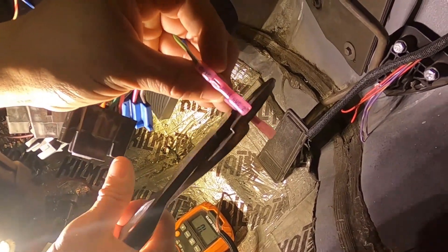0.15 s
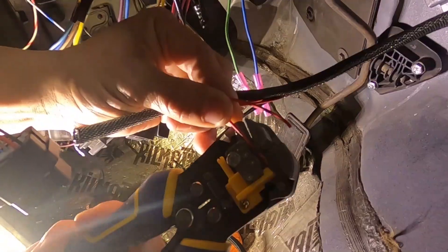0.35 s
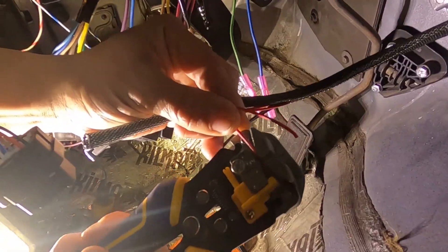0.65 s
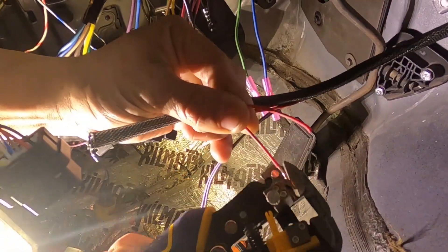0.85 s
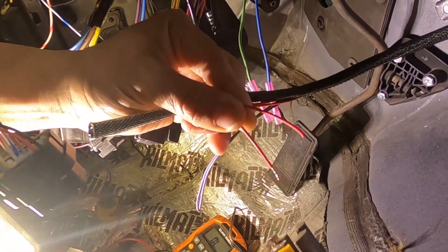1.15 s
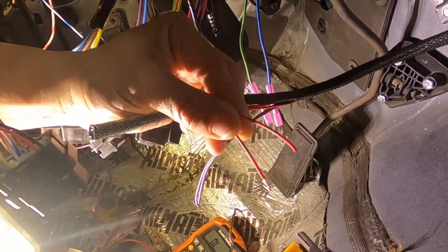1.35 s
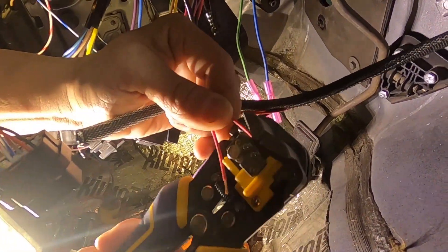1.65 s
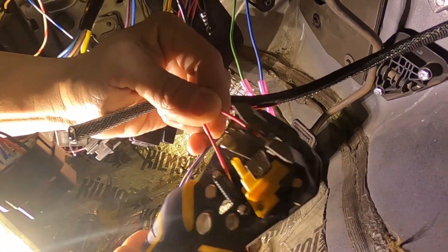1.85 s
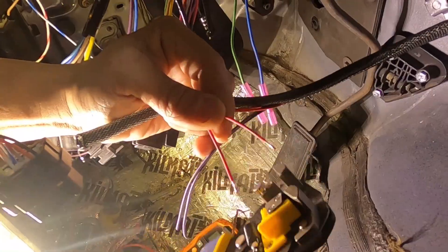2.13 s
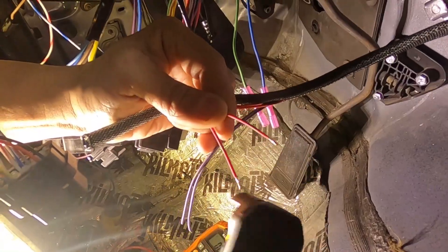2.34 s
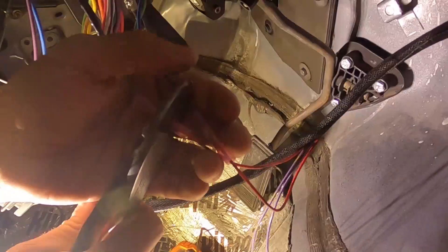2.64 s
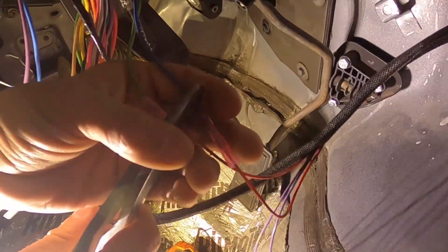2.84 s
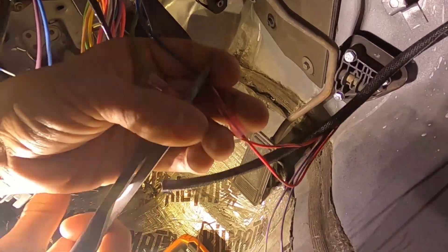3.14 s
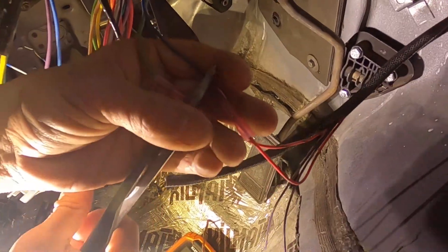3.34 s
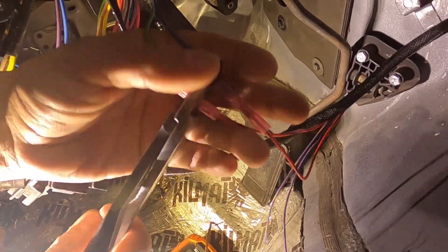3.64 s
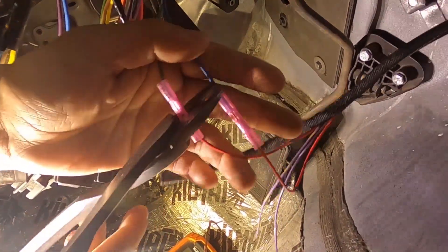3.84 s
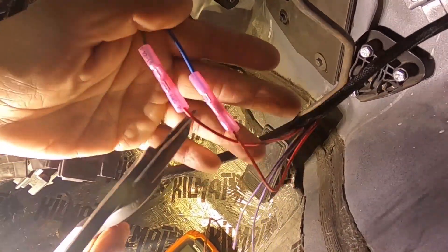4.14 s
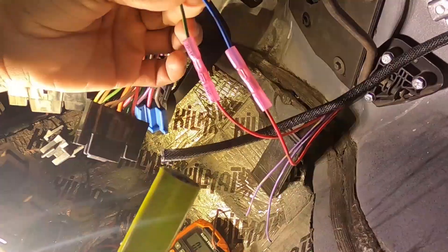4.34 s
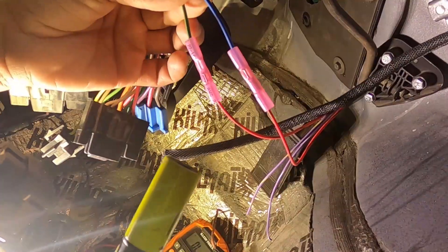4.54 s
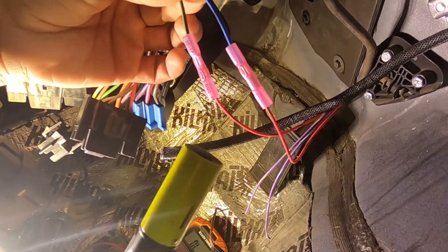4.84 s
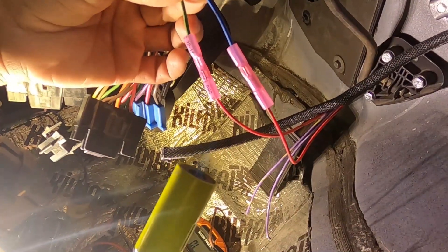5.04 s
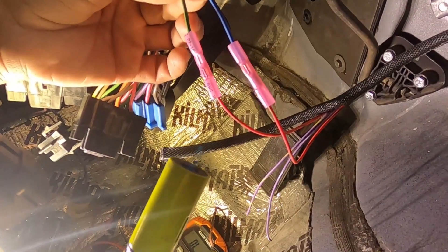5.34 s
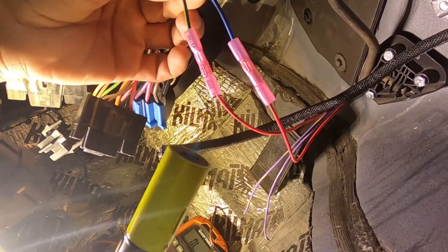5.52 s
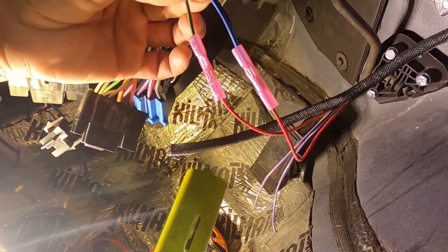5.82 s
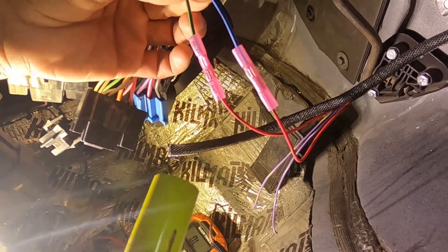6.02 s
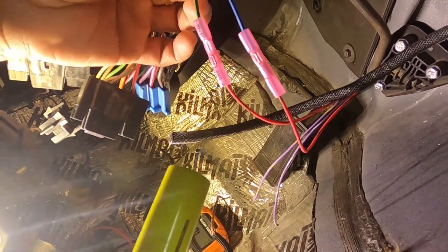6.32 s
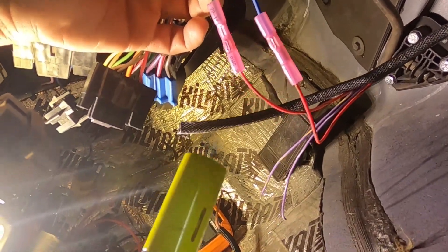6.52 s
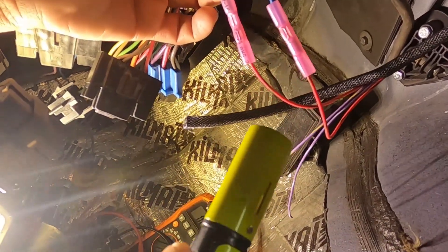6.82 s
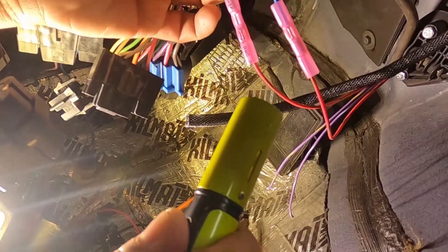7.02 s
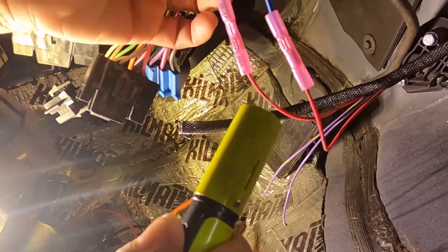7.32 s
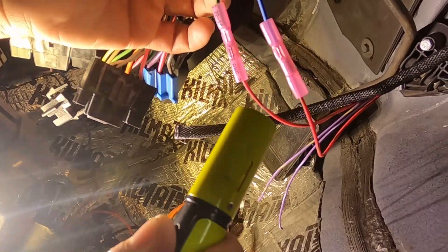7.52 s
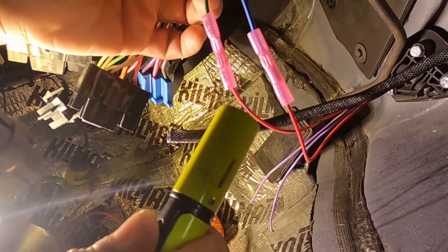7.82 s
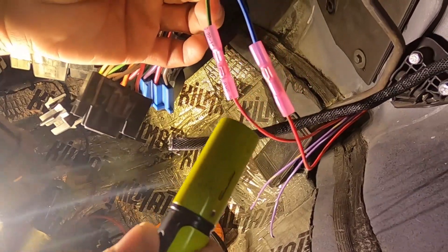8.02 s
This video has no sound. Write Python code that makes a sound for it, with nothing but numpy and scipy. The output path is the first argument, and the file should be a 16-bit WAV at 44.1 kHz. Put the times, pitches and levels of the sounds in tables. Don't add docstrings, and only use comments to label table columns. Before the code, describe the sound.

Nearly mono close microphone: fingers faintly rub wires, then hand tool jaws crack and rattle in several bursts. Pliers scrape softly, with a brief bright steel ping and abrupt edit ticks. Loud plastic igniter cracks come next, some with only thin gas hiss, one starting a short burn and the last a long, fluttering roar. A far low motor hums throughout, with very little room echo.

```python
import sys
import numpy as np
from scipy import signal
from scipy.fft import rfft, irfft, next_fast_len
from scipy.io import wavfile
from scipy.ndimage import uniform_filter1d, map_coordinates

SR = 44100
rng = np.random.default_rng(int(sys.argv[2]) if len(sys.argv) > 2 else 0)


def voltage_ratio(level):
    return 10 ** (np.asarray(level, float) / 20)


def inscribe(sig):
    pcm = np.round(np.clip(np.atleast_2d(sig).T, -1, 1) * 32767)
    wavfile.write(sys.argv[1], SR, pcm.astype(np.int16))


N = 360297


# time [s], peak [dB], centre [Hz], t60 [s].
BITES = [(0.8431, -21.5, 3080, .13), (0.8733, -8, 4480, .036), (0.8787, -11, 4420, .09),
         (1.0099, -24.5, 5750, .046), (1.0375, -26.5, 4470, .094), (1.1375, -15, 5590, .041),
         (1.1656, -9, 6440, .082), (1.2558, -27.5, 4480, .07), (1.3072, -25.5, 3720, .062),
         (1.39, -24.5, 4420, .11), (1.4249, -8.5, 5875, .058), (1.4558, -22, 3890, .21),
         (1.9896, -22.5, 3330, .048), (1.9971, -23, 7060, .084), (2.0117, -9.5, 6250, .056),
         (2.0202, -10.5, 3990, .049), (2.0364, -21, 6440, .05), (2.3793, -27.5, 4300, .077),
         (2.3887, -28.5, 4820, .031), (2.3986, -12, 5700, .1), (2.4265, -11.5, 4270, .076),
         (2.457, -6.5, 2900, .07), (2.5452, -29, 3520, .053), (2.6493, -16, 4040, .058),
         (2.6669, -7.5, 4460, .094), (2.6771, -12.5, 3370, .047)]
# time [s], peak [dB], centre [Hz], t60 [s].
RATTLES = [(0.919, -32.5, 3800, 0.12), (1.1084, -44, 5000, 0.041), (1.2372, -40.5, 5300, .18),
           (1.3475, -41, 4385, .078), (1.6883, -49.5, 3370, 0.11), (1.719, -46.5, 5900, 0.068),
           (2.078, -37, 5150, 0.15), (2.141, -43.5, 2560, 0.077), (2.1564, -33.5, 5000, .07),
           (2.1925, -35.5, 5500, .07), (2.2937, -34, 3310, .07)]
# time [s], peak [dB], centre [Hz].
PLIERS = [(0.366, -47.5, 4570), (0.56, -53, 2990), (0.6145, -41.5, 3330), (0.6445, -41, 3360),
          (2.804, -49, 2540), (2.9133, -48, 4400), (3.0547, -40.5, 4680), (3.3617, -38, 5870),
          (3.722, -50.5, 5130), (3.7988, -42, 5330), (4.131, -20.5, 3270), (4.1444, -37, 3560),
          (4.1584, -35, 2750), (4.2599, -43.5, 3470), (4.2777, -44.5, 4030)]
# lead-in [dB], top band [dB], its change per dB of force, per octave of centre [dB].
CONTACT_KINDS = [
    (-20.5, 0, 0.1136, -0.5),
    (-16, -3.5, -0.2, -10),
    (-24.5, -8.5, -0.6, -0.5),
]
# frequency [Hz], level [dB per Hz].
JAW_SPECTRUM = [(240, -48.5), (400, -20.5), (587, -22.5), (1350, -7), (1750, -9), (2690, -4), (2990, -2.5),
                (4390, -1.5), (4810, -2.5), (6250, -3), (9180, -18.5), (12300, -29), (15700, -43.5)]
# start [s], frequency [Hz], level [dB], t60 [s], damped after [s].
RINGING_STEEL = [
    (2.548, 4440, -63, .9, .075),
    (3.363, 5690, -39, 0.026, .05),
    (3.841, 5410, -69, 0.35, .1),
]


def stripper():
    x = sum(ring(*mode) for mode in RINGING_STEEL)
    pliers = [(*row, 0.045) for row in PLIERS]
    rows = []
    for table, kind in zip((BITES, RATTLES, pliers), CONTACT_KINDS):
        rows += [(*row, *kind) for row in table]
    for s, db, hz, t60, lead_db, top_db, per_db, per_octave in sorted(rows):
        top_db = top_db + per_db * (db + 33.5) + per_octave * np.log2(hz / 4500)
        lead_db = lead_db + 0.25 * (db + 15.5)

        def colour(f):
            return voltage_ratio(along(JAW_SPECTRUM, f)) * hump(f, hz, lift_db=6, octaves=0.3) * brightness(f, top_db)

        def coil(f):
            return colour(f) * brightness(f, -0.5)

        x += contact(s, db, t60 * 0.72, lead_db, colour, coil, spike_db=19, crack_db=2,
                     crack_s=0.016, lead_s=0.074, slip_hz=60)
        x += ring(s, hz=rng.uniform(230, 330), db=db - 30.5, t60=0.11)
    return x


# time [s], peak [dB], thump [dB], t60 [s], lead-in [dB].
STRIKES = [
    (4.469, -2.5, -32, 0.038, -13.5),
    (4.802, -2, -27, 0.048, -16),
    (5.0982, -3, -20, 0.031, -9.5),
    (6.121, -0.5, -43, 0.033, -15),
    (6.4634, -2.5, -19, 0.041, -15),
]
# centre [Hz], width [Hz], level [dB].
IGNITER_MODES = [(1380, 110, -2.5), (2420, 100, 7.5), (2710, 290, -1), (3560, 24, -3), (4650, 100, -24),
                 (5000, 120, -2), (5590, 81, -4), (5700, 360, -6.5), (6300, 75, 3), (7550, 310, -3.5)]
# frequency [Hz], level [dB per Hz].
CASE_SPECTRUM = [(400, -30.5), (950, -38), (1300, -12), (2000, -3), (2700, -1.5), (3300, -7), (6000, -4.5),
                 (7200, -8), (8100, -19.5), (12300, -31), (15700, -50)]
# frequency [Hz], level [dB per Hz].
COIL_SPECTRUM = [(880, -21), (1500, -19), (2040, -16.5), (2630, -9), (3710, -15.5), (6450, -5),
                 (7560, -4.5), (7840, -26), (8450, -27), (9630, -20), (14000, -43.5)]


def igniter():
    def case(f):
        modes = 0
        for k, (centre_hz, width_hz, db) in enumerate(IGNITER_MODES):
            damping = 1j * f * width_hz
            modes = modes + (-1) ** k * voltage_ratio(db) * damping / (centre_hz * centre_hz - f * f + damping)
        return voltage_ratio(along(CASE_SPECTRUM, f)) * (0.82 + 0.88 * modes)

    def coil(f):
        return voltage_ratio(along(COIL_SPECTRUM, f))

    x = np.zeros(N)
    for s, db, thump_db, t60, lead_db in STRIKES:
        x += contact(s - 0.0002, db, t60, lead_db - 8.5, case, coil, spike_db=27, crack_db=6.5,
                     crack_s=0.0087, lead_s=0.075, slip_hz=110.5)
        x += ring(s + 0.0016, hz=97.5, db=thump_db + 10.5, t60=0.13)
        x += ring(s + 0.0022, hz=210, db=thump_db - 8.5, t60=0.14)
    return x


# time [s], peak [dB], centre [Hz], t60 [s], top band [dB].
RELEASES = [(4.4035, -44.5, 1700, .06, -45.5), (4.6423, -43, 3410, .06, -1),
            (4.6787, -22, 3130, .049, -19.5), (4.915, -42.5, 1150, .06, -26.5),
            (4.9254, -41, 4360, .076, -24), (4.9649, -22, 2710, 0.07, -17), (5.0424, -48, 1360, 0.073, -3),
            (5.7067, -13.5, 1380, 0.038, -20), (6.3121, -34.5, 3160, 0.065, -10),
            (6.3445, -21, 1320, 0.067, -18), (6.3925, -43, 1500, 0.16, -45)]
# frequency [Hz], level [dB per Hz].
TRIGGER_SPECTRUM = [(290, -42), (500, -20), (1350, 1.5), (2160, -7.5), (2720, 1.5), (3790, -5.5),
                    (5670, -1), (8980, -19.5), (12100, -19.5), (15500, -37.5)]


def trigger():
    x = np.zeros(N)
    for s, db, hz, t60, top_db in RELEASES:
        top_db = 0.8 * np.clip(top_db + 24.5, -26, 6)
        lead_db = -21 - 0.24 * (db + 29.5)

        def colour(f):
            body = voltage_ratio(along(TRIGGER_SPECTRUM, f))
            return body * hump(f, hz, lift_db=4, octaves=0.407) * brightness(f, top_db)

        x += contact(s, db, t60, lead_db, colour, colour, spike_db=23.0, crack_db=11.5,
                     crack_s=0.026, lead_s=0.11, slip_hz=89.6)
    return x


# lit [s], out [s], first level [dB], last level [dB], edge over roar [dB].
FLAME = [
    (5.104, 5.732, -50.5, -49.5, -11),
    (6.482, 8.167, -49.5, -47, -9),
]
# frequency [Hz], level [dB per Hz].
ROAR_SPECTRUM = [(210, -25.5), (350, -7), (399, -18.5), (528, -16), (724, 1.5), (913, -7.5), (1040, 0),
                 (1160, -11.5), (1250, -3), (1800, -20), (2340, -39.5), (3960, -120)]
# frequency [Hz], level [dB per Hz].
EDGE_SPECTRUM = [(1060, -44), (1800, -3.5), (2080, -0.5), (2610, -5.5), (3290, -8), (4130, -14.5),
                 (4940, -15.5), (6230, -18.5), (7500, -43.5), (9750, -65), (16500, -120)]
# frequency [Hz], level [dB per Hz].
NOZZLE_SPECTRUM = [(4120, -31.5), (7000, 0.5), (7750, -10.5), (9690, -1.5), (12100, -3.5), (14500, -13),
                   (15000, -21.5), (15700, -28)]
# time [s], delay [ms].
NOZZLE_ECHO = [(5.1, 0.51), (5.7, 0.44), (6.5, .5), (7.0, .46), (7.3, .48), (8.17, .485)]
# delay [ms], gain [ratio].
PANELS = [(1.05, .13), (2.0, .18), (3.6, .11), (5.1, .1)]


def flame():
    lit, roar_db = held(FLAME)
    t = np.arange(N) / SR
    catch_db = sum(8 * np.exp(-np.abs(t - row[0]) / 0.1) for row in FLAME)
    edge_db = catch_db + np.where(t < FLAME[1][0] - 0.1, FLAME[0][-1], FLAME[1][-1])
    edge = voltage_ratio(edge_db) * rush(EDGE_SPECTRUM, patchy_db=-1.0, size=40)
    roar = voltage_ratio(0.69 * wobble(25)) * (rush(ROAR_SPECTRUM, patchy_db=-1.1) + edge)
    fire = roar + voltage_ratio(-23 + catch_db) * rush(NOZZLE_SPECTRUM, patchy_db=-2.5, size=50)
    skip = N // 2

    def echo(delay_ms):
        source = np.arange(N) - skip - delay_ms * SR / 1000
        return np.pad(map_coordinates(fire[skip:], [source[skip:]]), (skip, 0))

    near = echo(curves([NOZZLE_ECHO])[1] + 0.015 * wobble(4))
    sway = wobble(1.5)
    sways = [np.roll(sway, k * 2 * SR) for k in range(5)]
    far = 0
    for k, (delay_ms, gain) in enumerate(PANELS):
        far = far + gain * voltage_ratio(3 * sways[k]) * echo(delay_ms * (1 + 0.07 * sways[k + 1]))
    return lit * voltage_ratio(roar_db) * unit(fire + 0.3 * near + far) * np.std(fire)


# valve opens [s], shuts [s], first level [dB], last level [dB].
GAS = [
    (4.5, 4.67, -68.5, -69.5),
    (4.83, 4.96, -73, -67),
    (6.15, 6.34, -57.5, -63.5),
]
# frequency [Hz], level [dB per Hz].
JET_SPECTRUM = [(1180, -47), (2000, -8), (2300, -5.5), (2500, -11), (3300, -10.5), (4500, -9), (5530, -8),
                (6140, -0.5), (7170, -6), (8890, -20.5), (12300, -16.5), (14900, -32), (15700, -45.5)]


def unlit_gas():
    is_open, gas_db = held(GAS)
    return is_open * voltage_ratio(gas_db + 1.2) * rush(JET_SPECTRUM, patchy_db=1.2)


# middle [s], half length [s], level [dB], brightness [dB].
STROKES = [(.1, 0.28, -82, 8.5), (0.614, 0.11, -69.5, -2), (1.717, .1, -79, 0), (2.099, .07, -60, -3),
           (2.27, .12, -77, 5), (2.51, .05, -64, -9), (2.9, 0.095, -68, 2), (3.02, 0.039, -66.5, 2),
           (3.125, 0.053, -64, 4.5), (3.332, 0.087, -70, -12.5), (3.523, 0.15, -83.5, 0),
           (3.816, 0.052, -61.5, 3), (3.966, 0.071, -68, 3.5), (4.24, .06, -70, -5), (4.385, 0.11, -80, 8),
           (4.708, .03, -79.5, 0), (5.027, .05, -81, -3), (5.825, .12, -80.5, 1.5), (6.39, 0.05, -80, -4)]
# frequency [Hz], level [dB per Hz].
SKIN_SPECTRUM = [(3000, -30.5), (4400, -5), (5600, -1.5), (7000, -6.5), (8500, -23.5), (11000, -68.5)]
# frequency [Hz], level [dB per Hz].
DRAG_SPECTRUM = [(1500, -29), (2400, -4), (3500, -5.5), (4400, -5), (6000, -30), (9000, -81.5)]
# frequency [Hz], level [dB per Hz].
SCRAPE_SPECTRUM = [(6500, -39.5), (8500, 2), (11000, -7), (13500, -14.5), (15000, -58.5)]


def hands():
    idle_db = -85
    rub, drag, fine = voltage_ratio(idle_db), voltage_ratio(idle_db - 0.5), 0
    for s, half_s, db, bright_db in STROKES:
        swell = bell(s, half_s)
        rub = rub + voltage_ratio(db - 3.5) * swell
        drag = drag + voltage_ratio(db - 4.5 - 0.75 * bright_db) * swell
        fine = fine + voltage_ratio(-71.5 + 1.5 * (db + 70) - 21.5 + 2.4 * bright_db) * swell
    grain = unit(voltage_ratio(1.5 * wobble(60) + 1.5 * wobble(300)))
    friction = rub * rush(SKIN_SPECTRUM, patchy_db=7.5)
    friction = friction + drag * rush(DRAG_SPECTRUM, patchy_db=6.5)
    return grain * (friction + fine * rush(SCRAPE_SPECTRUM, patchy_db=1.5))


# frequency [Hz], t60 [s].
GARAGE_T60 = [(500, 0.3), (3000, 0.11), (12000, 0.096)]


def garage(x):
    hz, t, z = signal.stft(rng.standard_normal(SR // 3), SR, nperseg=256)
    decay = voltage_ratio(-60 * t / along(GARAGE_T60, hz)[:, None])
    tail = signal.istft(z * decay, SR, nperseg=256)[1]
    return signal.fftconvolve(x, tail / np.linalg.norm(tail))[:N]


# time [s], drone level [dB].
LOAD = [(0.0, -32), (0.27, -37.5), (0.7, -34.5), (1.14, -37.5), (2.34, -36.5), (3.27, -32.5), (3.66, -35.5),
        (4.35, -34), (4.94, -36), (7.14, -37.5), (8.17, -34.5)]
# middle [s], half length [s], lift [dB].
SURGES = [
    (.7, 0.31, 8.5),
    (1.6, 0.28, 10.5),
    (2.35, .4, 3),
    (3.754, .35, 5.5),
    (4.947, 0.11, 5.5),
    (6.21, 0.3, 6),
]
# frequency [Hz], level [dB per Hz].
DEEP_SPECTRUM = [(12, -42), (25, -23.5), (35, -12.5), (44, -6), (53, -2), (62, -9.5), (75, -14),
                 (95, -32.5), (150, -120)]
# frequency [Hz], level [dB per Hz].
DRONE_SPECTRUM = [(45, -36.5), (70, -3.5), (84, -10.5), (96, 2.5), (110, -6), (125, -7.5), (150, -10),
                  (172, -24.5), (205, -25.5), (219, -14.5), (236, -27), (290, -30), (340, -44.5),
                  (460, -56), (700, -92)]
# frequency [Hz], level [dB per Hz].
AIR_SPECTRUM = [(240, -31.5), (400, -1.5), (613, -14.5), (686, -5.5), (938, -15), (1080, -8), (1400, -6.5),
                (1780, -18.5), (2090, -15), (2620, -28), (6070, -32), (8000, -43.5), (10400, -78.5),
                (17600, -120)]


def rumble():
    drone_db = curves([LOAD])[1]
    deep_db = -46.5 + sum(db * bell(s, half_s) for s, half_s, db in SURGES)
    deep = voltage_ratio(deep_db + 5.0 + 0.4 * wobble(8.8)) * rush(DEEP_SPECTRUM, patchy_db=-4.37)
    drone = voltage_ratio(drone_db + 1.5 + 1.7 * wobble(9.2)) * rush(DRONE_SPECTRUM, patchy_db=-0.08)
    return deep + drone + voltage_ratio(-65) * rush(AIR_SPECTRUM, patchy_db=-1.3)


def contact(s, db, t60, lead_db, colour, coil, spike_db, crack_db, crack_s, lead_s, slip_hz):
    t = np.arange(-SR // 10, SR // 5) / SR
    noise = rng.standard_normal((2, len(t)))
    late = np.clip(t, 0, None)
    flutter_db = 43 * uniform_filter1d(rng.standard_normal(len(t)), SR // 400)
    rattle = voltage_ratio(-60 * late / t60 + flutter_db)
    crack = voltage_ratio(crack_db - 60 * late / crack_s)
    force = noise[0] * (rattle + crack) * (1 - np.exp(-late / 0.00076))
    force[SR // 10 + SR // 1500] += voltage_ratio(spike_db)
    steps = 0.8 + 0.2 * np.cos(2 * np.pi * slip_hz * t + 0.8)
    rise = np.clip(1 + t / 0.04, 0, 1) ** 0.5
    before = (t < 0.001) * voltage_ratio(lead_db - 60 * np.abs(t) / lead_s) * steps * rise
    grid = np.linspace(0, SR / 2, 110)
    tones = rng.standard_normal((2, len(grid)))
    blow = causal(force, lambda hz: colour(hz) * voltage_ratio(2.2 * np.interp(hz, grid, tones[0])))
    slip = filtered(noise[1], lambda hz: coil(hz) * voltage_ratio(7.5 * np.interp(hz, grid, tones[1])))
    spring = before * unit(slip)
    out = np.zeros(N + SR)
    start = round(s * SR) + SR // 2 - SR // 10
    out[start:][:len(t)] = voltage_ratio(db) * (blow / np.abs(blow).max() + spring)
    return out[SR // 2:][:N]


def ring(s, hz, db, t60, last=0.55):
    u = np.arange(round(last * SR)) / SR
    mode = voltage_ratio(db - 60 * u / t60) * np.sin(2 * np.pi * hz * u)
    out = np.zeros(N + SR)
    out[round(s * SR):][:len(u)] = mode * signal.windows.tukey(len(u), 0.02)
    return out[:N]


def rush(spectrum, patchy_db, size=10):
    z = signal.stft(rng.standard_normal(N), nperseg=512)[2]
    field = uniform_filter1d(rng.standard_normal(z.shape), 6, 0)
    field = unit(uniform_filter1d(field, size, 1))
    x = signal.istft(z * voltage_ratio(np.clip(patchy_db, 0, 2.5) * field), nperseg=512)[1][:N]
    return unit(filtered(x, lambda hz: voltage_ratio(along(spectrum, hz))))


def hump(hz, centre_hz, lift_db, octaves):
    return voltage_ratio(lift_db * np.exp(-(np.log2((hz + 1) / centre_hz) / octaves) ** 2))


def brightness(hz, top_db):
    return voltage_ratio(top_db * np.clip(np.log2((hz + 1) / 5500) / 0.47, 0, 1))


def bell(s, half_s):
    return np.exp(-((np.arange(N) / SR - s) / half_s) ** 2)


def wobble(rate):
    return map_coordinates(rng.standard_normal(int(N * rate / SR) + 4), [np.arange(N) * rate / SR])


def curves(spans):
    t = np.arange(N) / SR
    gate = sum((t >= rows[0][0]) & (t <= rows[-1][0]) for rows in spans)
    s, *columns = np.transpose(np.concatenate(spans))
    return [uniform_filter1d(gate * 1.0, SR // 50)] + [np.interp(t, s, c) for c in columns]


def held(rows):
    return curves([[(row[0], row[2]), (row[1], row[3])] for row in rows])


def unit(x):
    return x / np.sqrt(np.mean(x ** 2) + 1e-20)


def along(points, hz):
    f, v = np.transpose(points)
    return np.interp(np.log(hz + 1), np.log(f + 1), v)


def filtered(x, response):
    m = next_fast_len(x.shape[-1] + 4096)
    return irfft(rfft(x, m) * response(np.fft.rfftfreq(m, 1 / SR)), m)[..., :x.shape[-1]]


def causal(x, response):
    m = next_fast_len(len(x) + 4096) // 2 * 2
    cepstrum = irfft(np.log(np.abs(response(np.fft.rfftfreq(m, 1 / SR))) + 1e-6), m)
    cepstrum = cepstrum * np.r_[1, np.full(m // 2 - 1, 2), 1, np.zeros(m // 2 - 1)]
    return irfft(rfft(x, m) * np.exp(rfft(cepstrum)), m)[:len(x)]


# time [s], step [dB], t60 [s].
SPLICES = [
    (0.3021, -36, 0.0046),
    (1.4713, -32, 0.002),
    (2.6884, -52, 0.0031),
    (4.34, -30, 0.0025),
]


def splice_ticks():
    t = np.arange(N) / SR
    return sum((t >= s) * voltage_ratio(db + 4 - 60 * np.abs(t - s) / t60) for s, db, t60 in SPLICES)


# frequency [Hz], side over mid [dB].
TOOL_WIDTH = [(150, -73.5), (350, -22.5), (700, -29), (1500, -43.5), (3500, -45.5), (4500, -36),
              (10500, -22.5), (16000, -21)]
# frequency [Hz], side over mid [dB].
PORT_WIDTH = [(60, -88.5), (9500, -49.5), (10800, -24.5), (11300, -4), (16000, -2)]


def scene():
    tools = stripper() + igniter() + trigger()
    tools = tools + voltage_ratio(-16.5) * garage(tools)
    t = np.arange(N) / SR
    for s, _, _ in SPLICES[1:3]:
        tools[(t > s) & (t < s + 0.09)] *= voltage_ratio(-47.0)
    mid = tools + flame() + unlit_gas() + hands() + rumble() + splice_ticks()
    scatter = -0.12 + np.exp(2j * np.pi * rng.random(120))

    def turn(hz):
        return np.interp(hz, np.linspace(0, SR / 2, 120), scatter)

    side = filtered(tools, lambda hz: voltage_ratio(along(TOOL_WIDTH, hz)) * turn(hz))
    side += filtered(mid, lambda hz: voltage_ratio(along(PORT_WIDTH, hz)) * turn(hz))
    return np.array([mid + side, mid - side])


def roll_off(x):
    return signal.sosfilt(signal.butter(12, 15860, fs=SR, output="sos"), x)


def record(dry):
    ceiling, top_hz = 0.85, 15870
    soft = dry / (1 + np.abs(dry / ceiling) ** 4) ** (1 / 4)
    mix = filtered(soft, lambda hz: np.clip((top_hz - hz) / 700, 0, 1))
    return roll_off(mix)


dry = scene()
out = record(dry)
inscribe(out)
```